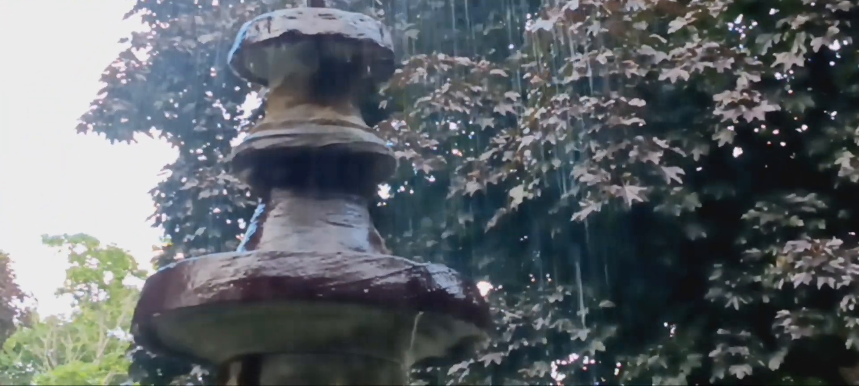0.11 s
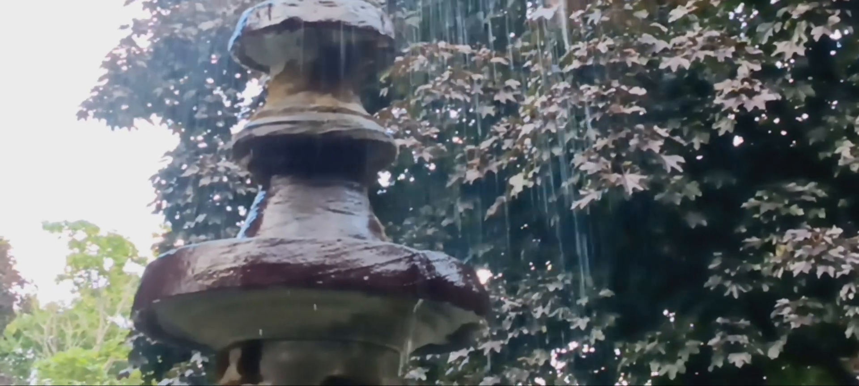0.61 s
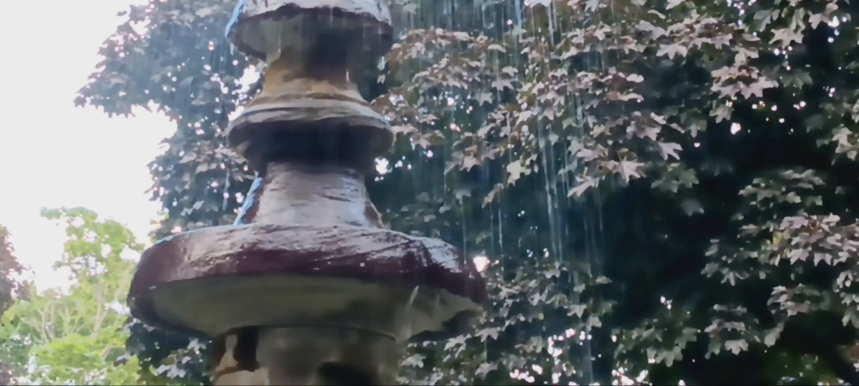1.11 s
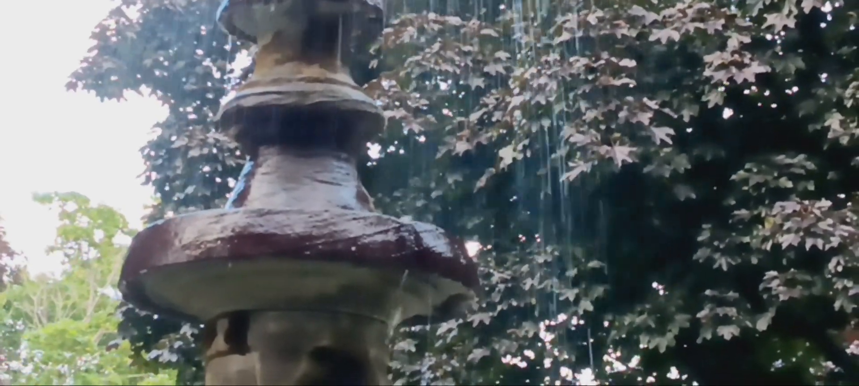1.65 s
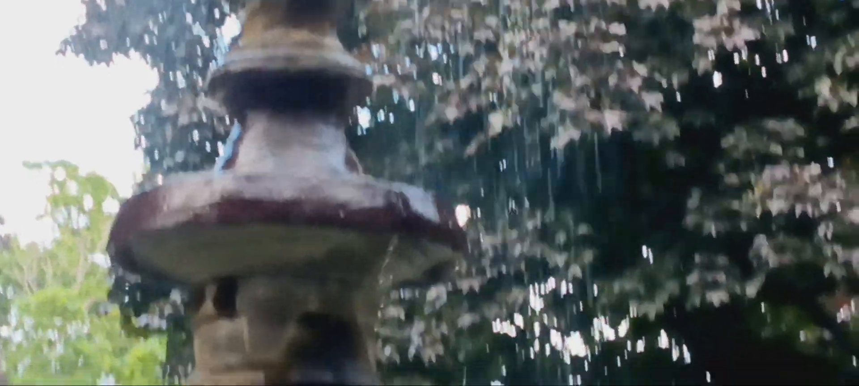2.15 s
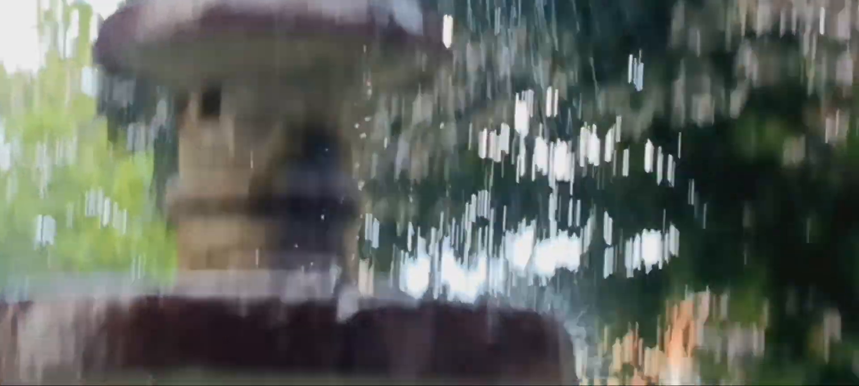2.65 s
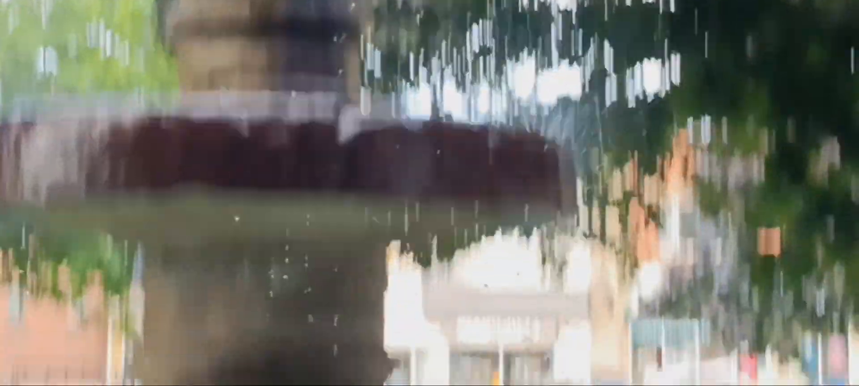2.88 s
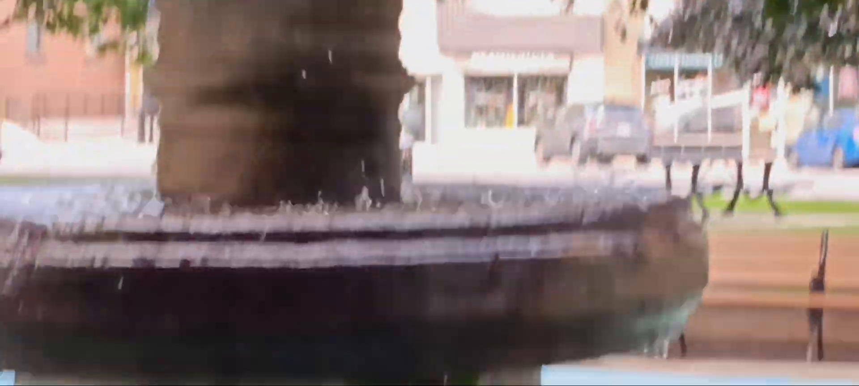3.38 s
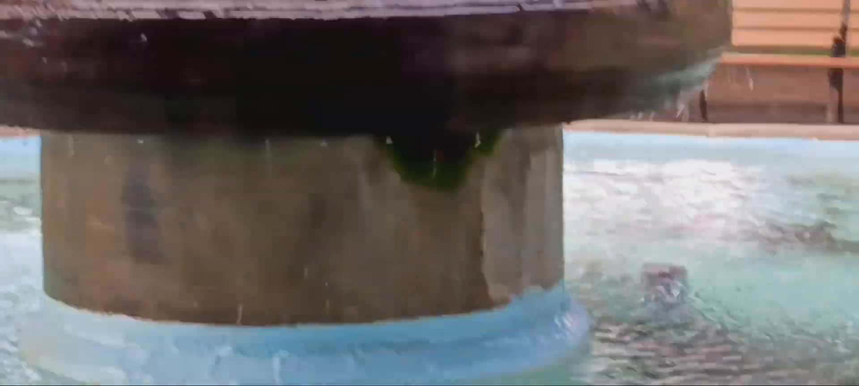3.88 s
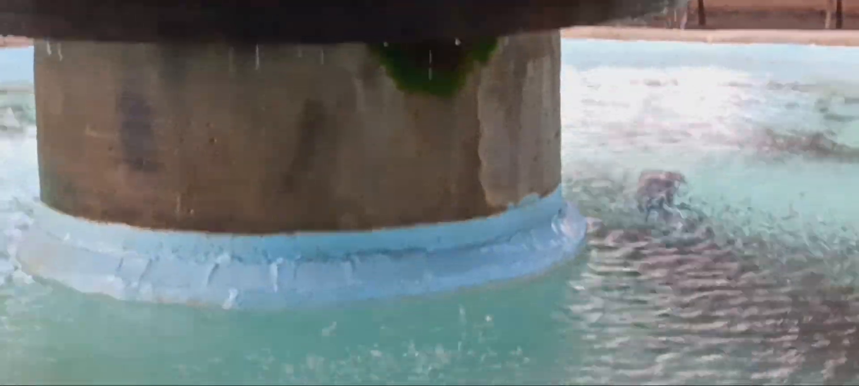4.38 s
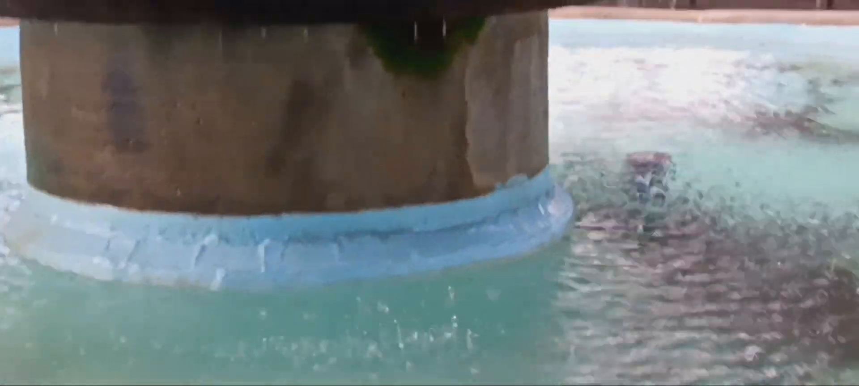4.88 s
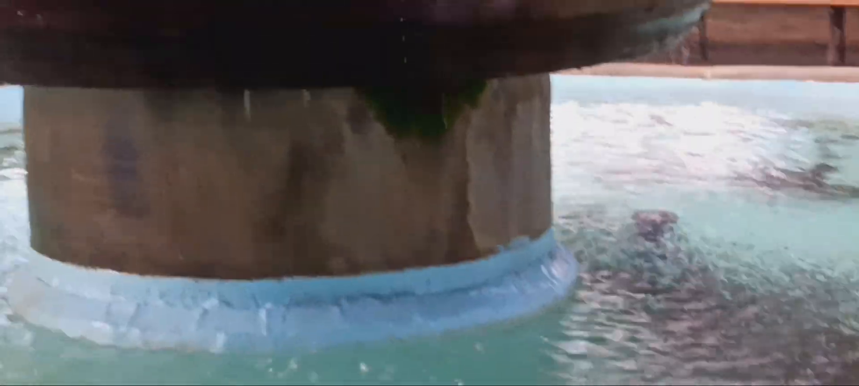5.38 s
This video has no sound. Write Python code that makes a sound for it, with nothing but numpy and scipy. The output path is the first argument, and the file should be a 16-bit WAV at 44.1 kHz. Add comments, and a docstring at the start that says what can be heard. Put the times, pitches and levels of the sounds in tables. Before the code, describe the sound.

Close, bright fountain patter: hissing spray, sharp wet splashes and quick ringing bubbles in a stone basin, with a soft distant town rumble underneath.

```python
"""A stone fountain in a town: water falls from its tiers into the basin, over low traffic rumble.
Shaped noise makes the hissing spray and the churning wash; gliding sines make the ringing bubbles
and pattering droplets; short noise bursts make the sharp splashes. Short dense tails give the stone.
It is heard through two unlike microphone ports, the left one a little late."""
import sys
import numpy as np
from scipy import signal
from scipy.fft import rfft, irfft, next_fast_len
from scipy.io import wavfile
from scipy.ndimage import uniform_filter1d

SR = 44100
rng = np.random.default_rng(int(sys.argv[2]) if len(sys.argv) > 2 else 0)


def amp(db):
    return 10 ** (np.asarray(db, float) / 20)


def write(x):
    x = np.atleast_2d(x).T
    wavfile.write(sys.argv[1], SR, np.round(np.clip(x, -1, 1) * 32767).astype(np.int16))


N = 243431  # length in samples

# How much water falls as spray. Each row: time in seconds, spray level in dB.
SPRAY_LEVEL = [(0.0, -40), (0.12, -41), (0.43, -36.5), (0.61, -39), (1.46, -40), (1.69, -40), (1.97, -38.5),
               (2.43, -39), (3.0, -37), (3.26, -38.5), (4.3, -38), (5.0, -39), (5.4, -38), (5.52, -42.5)]
# Swells of the traffic. Each row: time in seconds, deep rumble in dB, drone above 90 Hz in dB.
RUMBLE_LEVEL = [(0.0, -39, -51), (0.31, -48.5, -44), (0.4, -52, -62), (0.47, -37.5, -49.5),
                (0.72, -46.5, -47), (0.8, -55, -50.5), (1.04, -42.5, -44), (1.92, -48.5, -49),
                (2.2, -43, -50.5), (3.06, -44, -48.5), (3.18, -44.5, -49.5), (3.32, -42.5, -45.5),
                (4.3, -42, -52.5), (4.38, -43, -51.5), (4.47, -43.5, -50.5), (5.21, -44.5, -44.5),
                (5.37, -31.5, -37.5), (5.52, -65, -54.5)]
# The random crowd of gurgling bubbles. Each row: time in seconds, level in dB.
GURGLE_LEVEL = [(0.0, -59.5), (0.3, -55), (0.7, -57.5), (0.92, -55), (1.1, -61.5), (1.3, -56), (1.7, -61.5),
                (2.33, -54.5), (2.45, -65.5), (2.75, -59.5), (3.3, -58.5), (3.55, -60), (3.66, -66.5),
                (3.93, -53.5), (4.3, -69), (4.5, -58.5), (4.75, -68), (5.03, -77), (5.18, -51.5),
                (5.52, -82)]
# Churning water in the basin. Each row: time in seconds, level in dB.
CHURN_LEVEL = [(0.0, -47.5), (0.3, -48), (0.47, -44), (0.57, -47.5), (0.66, -52.5), (0.75, -48),
               (0.97, -48.5), (1.05, -54.5), (1.18, -45), (1.28, -49), (1.4, -48), (1.62, -50.5),
               (1.75, -47), (2.18, -48), (2.26, -52.5), (2.5, -48.5), (2.8, -47.5), (3.3, -47),
               (3.7, -48.5), (4.1, -47.5), (4.3, -49.5), (4.75, -46), (4.88, -48.5), (4.98, -42.5),
               (5.15, -47.5), (5.25, -43.5), (5.52, -49)]
# Big splashes. Each row: start in seconds, slap level in dB, pitch centre of the slap in Hz,
# level of the fizz above 7 kHz in dB, length in seconds.
SPLASHES = [(0.0317, -53, 6600, -22.5, 0.014), (0.0493, -48, 6240, -26.5, 0.014),
            (0.1901, -36.5, 6600, -35, 0.14), (0.2608, -29.5, 2160, -23.5, 0.013),
            (0.3207, -26.5, 6200, -28, 0.016), (0.3662, -29, 3980, -33, 0.02),
            (0.3895, -24.5, 3960, -42, 0.018), (0.6505, -30, 6860, -34, 0.021),
            (0.8681, -31.5, 3540, -24.5, 0.015), (0.8855, -32, 3950, -50, 0.022),
            (1.0853, -39, 6150, -30, 0.017), (1.1628, -31.5, 4200, -51, 0.013),
            (0.2309, -34, 5300, -41, .015), (1.2356, -30.5, 6060, -42, 0.072),
            (1.3478, -36.5, 4270, -51, 0.29), (1.4715, -32, 6000, -31.5, 0.028),
            (1.6613, -54, 6800, -28.5, 0.03), (1.7628, -31, 4000, -28, 0.014),
            (1.9728, -31, 6800, -40, 0.14), (1.9907, -27.5, 3850, -25, 0.016),
            (2.0296, -29.5, 5400, -24.5, 0.02), (2.1121, -30, 6630, -34, 0.069),
            (2.1413, -31.5, 3320, -33, 0.047), (2.5177, -25.5, 6070, -36, 0.032),
            (2.6594, -40, 6750, -20, 0.013), (2.7082, -40, 6600, -31, .012), (2.7851, -31, 3120, -45, .012),
            (2.8365, -32, 6450, -43, .015), (2.7479, -27, 3420, -52, 0.0069),
            (2.8932, -49, 7000, -26.5, .032), (2.944, -24.5, 6300, -24.5, 0.028),
            (3.0239, -29, 3200, -32, 0.032), (3.0963, -43, 7000, -26, .024),
            (3.3411, -33, 3150, -49, 0.049), (3.3594, -34, 5900, -28, 0.047),
            (3.3819, -36, 4080, -34, 0.048), (3.676, -27, 3520, -35, 0.014),
            (3.7146, -32.5, 5200, -22.5, 0.037), (3.9639, -33, 4320, -31, 0.07),
            (3.9951, -22.5, 2810, -47, 0.012), (4.0983, -26, 3250, -41, 0.0085),
            (4.139, -28, 3340, -25, 0.013), (4.3555, -32, 2840, -45, 0.017),
            (4.4313, -30.5, 3400, -40, 0.024), (3.9474, -30, 4120, -40, .012),
            (4.5191, -30.5, 6850, -24.5, 0.05), (4.5778, -28.5, 3700, -35, 0.056),
            (4.6189, -34, 7000, -27, 0.069), (4.679, -26.5, 3900, -41, 0.031),
            (4.7255, -31, 2520, -50, .015), (4.7882, -29, 3940, -50, 0.035),
            (4.9277, -28.5, 3800, -53, 0.011), (4.9523, -29.5, 3900, -49, 0.025),
            (4.9624, -29.5, 3500, -42, 0.054), (4.9998, -41, 3700, -24, .016),
            (5.0228, -29.5, 5400, -28, 0.086), (5.0593, -28.5, 2400, -42, 0.019),
            (5.1865, -27.5, 2580, -25, 0.028), (5.2173, -26, 3800, -29, 0.026),
            (5.2429, -35, 3140, -48, 0.055), (5.3873, -48, 6700, -24, .014)]
# Bubbles that stand out singly. Each row: start in seconds, rms level in dB at the top of the swell
# ahead of port colour, start pitch in Hz, pitch factor reached after one length, length in seconds.
SINGLE_BUBBLES = [(0.067, -38, 838, 1.09, 0.014), (0.17, -38.5, 815, 0.94, 0.021),
                  (0.25, -35, 893, 0.95, 0.0096), (0.269, -37.5, 840, 0.99, 0.017),
                  (0.376, -44, 777, 0.98, 0.034), (0.378, -47, 1530, 1.16, 0.006),
                  (0.407, -41.5, 993, 1.17, 0.013), (0.504, -43, 2035, 0.98, 0.015),
                  (0.51, -38, 1267, 1.07, .01), (0.531, -48, 810, 1.06, 0.018),
                  (0.595, -45, 2050, 1.06, .012), (0.742, -47, 715, 1.05, 0.0087),
                  (0.85, -49, 1600, 1.3, 0.0087), (0.495, -37, 880, 0.97, 0.01),
                  (0.559, -41.5, 613, 1.27, 0.021), (0.654, -44, 1075, 0.93, 0.025),
                  (0.748, -37, 2230, 0.99, 0.003), (0.77, -30, 704, 1, 0.018),
                  (0.801, -32.5, 1280, 0.96, 0.007), (0.751, -40, 1590, 1.08, .006),
                  (0.941, -42, 750, 1.2, 0.011), (0.821, -32.5, 810, 0.94, 0.013),
                  (0.931, -36.5, 678, 1.11, 0.023), (0.955, -34, 1980, 1, 0.0049),
                  (1.196, -39, 895, 1.16, 0.0086), (1.316, -37, 910, 1.07, 0.012),
                  (1.376, -30.5, 1500, 0.91, 0.0036), (1.383, -39, 1530, 1.0, 0.03),
                  (1.428, -39, 1525, 1.0, .04), (1.135, -41.5, 1400, 1.08, 0.028),
                  (1.277, -40.5, 1410, 0.93, 0.014), (1.369, -42.5, 706, 1.12, 0.012),
                  (1.605, -47, 1215, 1.04, 0.028), (1.645, -47.5, 675, 0.97, 0.035),
                  (1.707, -48, 694, 1.03, 0.021), (1.536, -41.5, 886, 1.11, 0.017),
                  (1.779, -28, 1330, 1.04, 0.0039), (1.783, -48, 823, 0.98, 0.033),
                  (1.84, -37, 702, 1.08, 0.012), (1.873, -41, 1670, 0.92, 0.0077),
                  (1.929, -42.5, 585, 1.06, 0.029), (2.067, -37, 783, 1.35, 0.012),
                  (2.082, -34, 2080, 1.04, 0.0068), (2.111, -41, 2110, 1.0, 0.0086),
                  (2.138, -51, 2080, 0.85, 0.0097), (2.179, -42.5, 2160, 0.96, 0.016),
                  (2.163, -38, 837, 0.98, 0.023), (2.371, -44.5, 1680, 1.0, 0.02),
                  (2.436, -48, 2200, 0.75, 0.014), (2.592, -47, 864, 0.95, 0.014),
                  (2.652, -49, 945, 1.02, 0.014), (2.7, -48, 874, 0.82, 0.021),
                  (2.736, -34, 1600, 0.88, 0.0038), (2.81, -43.5, 828, 1.1, 0.012),
                  (2.848, -45, 880, 1.0, 0.012), (2.27, -45, 690, 1.07, 0.019),
                  (2.328, -41, 642, 1.12, 0.033), (2.373, -46, 840, 0.81, 0.028),
                  (2.566, -41.5, 880, 0.93, 0.011), (2.748, -41.5, 730, 1.15, 0.01),
                  (2.948, -47, 900, 1, 0.026), (3.029, -43.5, 880, 1.01, 0.018),
                  (3.052, -54, 1630, 1.6, 0.0058), (3.118, -35.5, 2175, 1, 0.009),
                  (3.149, -40.5, 786, 0.98, 0.028), (3.201, -38.5, 867, 0.98, 0.0093),
                  (3.133, -49, 880, 1.16, 0.016), (3.217, -36, 1000, 1.8, 0.0068),
                  (3.14, -38.5, 1750, 1.06, 0.0078), (1.172, -47, 845, 0.97, 0.029),
                  (1.226, -46, 766, 1.1, 0.018), (4.366, -45.5, 1144, 0.98, 0.012),
                  (4.622, -44.5, 788, 1.06, 0.016), (4.868, -46, 1110, 1.02, 0.023),
                  (0.71, -39.5, 1485, 1.03, 0.012), (0.782, -48, 945, 1.2, 0.013),
                  (3.41, -49, 740, 1, 0.013), (3.295, -49.5, 762, 1.06, 0.043),
                  (3.343, -37, 1630, 1.07, 0.0079), (3.436, -32, 2370, 1.1, .006),
                  (3.483, -45, 820, 1.1, 0.017), (3.566, -49, 770, 1.5, 0.0092),
                  (3.69, -46, 2300, 1.1, .006), (3.779, -49, 900, 1.0, 0.011),
                  (3.809, -40, 1050, 1.15, 0.01), (3.905, -54, 855, 0.94, 0.0086),
                  (3.963, -45, 895, 1.06, 0.012), (4.087, -36, 1910, 0.93, 0.0066),
                  (4.238, -41, 1980, 1.04, 0.014), (4.303, -43, 1160, 0.91, 0.0089),
                  (4.28, -40, 1590, 1.2, 0.0056), (4.43, -41, 1980, 0.98, 0.006),
                  (4.542, -46, 768, 1.0, 0.021), (4.696, -41, 1900, 1.2, 0.0061),
                  (4.755, -38, 2250, 0.94, 0.0044), (4.917, -41, 1990, 1.1, 0.01),
                  (3.638, -31.5, 2010, 1.04, 0.0043), (3.824, -34.5, 820, 1.16, 0.018),
                  (3.928, -39, 913, 0.91, 0.01), (3.985, -26.5, 1810, 0.89, 0.0054),
                  (4.052, -26.5, 780, 1.25, 0.0095), (4.07, -46, 1050, 0.89, 0.022),
                  (4.145, -41.5, 930, 0.92, 0.013), (4.391, -47.5, 860, 1.06, 0.018),
                  (4.515, -38.5, 1074, 1.05, 0.0096), (4.628, -29, 1520, 0.9, 0.0044),
                  (4.642, -41, 1300, 0.86, 0.0087), (4.765, -48, 690, 0.98, 0.025),
                  (4.856, -39, 583, 1.07, 0.026), (4.948, -44, 2240, 1.3, 0.011),
                  (4.959, -38, 810, 1.13, 0.0063), (4.98, -43, 1620, 0.76, 0.012),
                  (5.055, -28.5, 1640, 0.94, 0.004), (5.058, -31, 2250, 1, 0.0035),
                  (5.096, -38, 1295, .92, 0.025), (5.151, -38, 775, 2.06, 0.013),
                  (5.177, -41, 764, 1.04, 0.019), (5.274, -38, 1870, 1.33, 0.0085),
                  (5.28, -47.5, 685, 0.97, 0.029), (5.346, -43.5, 732, 1.03, 0.022),
                  (5.115, -42.5, 816, 0.95, 0.034), (5.383, -43, 1203, 1.05, 0.031),
                  (5.441, -35.5, 1254, 1.2, 0.013), (5.408, -39, 770, 0.93, 0.026),
                  (5.492, -40, 587, 1.27, 0.02), (5.51, -32, 970, 1, 0.0048)]
# Colour of the two microphone ports. Each row: frequency in Hz, left gain in dB, right gain in dB.
PORT_COLOUR = [(148, -3, -3.5), (780, -3, -2), (880, 0.5, -6.5), (1153, -5, -9.5), (1690, 2, -9.5),
               (2580, 1, -3.5), (4140, 1, 1), (5400, -3.5, 7), (6600, 8, 7), (7950, 0.5, 4),
               (10320, 8.5, 15.5), (11520, 10, 7), (13400, 2.5, 0.5), (15800, -2.5, -2)]
# Relative spectrum of the traffic. Each row: frequency in Hz, density in dB per Hz.
RUMBLE_SPECTRUM = [(8.8, -41), (15, -17), (54, 1), (97, 0), (144, -3), (216, -18), (257, -25.5),
                   (409, -41.5), (480, -68), (620, -80), (1060, -120)]
# Relative spectrum of the spray ahead of port colour. Each row: frequency in Hz, density in dB per Hz.
SPRAY_SPECTRUM = [(300, -7), (500, -16), (800, -17), (1300, -16), (2200, -10), (3500, -13), (6000, -1.5),
                  (15000, 1)]
# Relative spectrum of the basin wash ahead of port colour. Each row: frequency in Hz, density in dB per Hz.
WASH_SPECTRUM = [(500, -30), (700, -21), (1100, -18), (1500, -2), (2500, 0), (4000, 2), (6000, -16)]
# How alike the two sides of a noise are. Each row: frequency in Hz, left-right likeness from 0 to 1.
LIKENESS = [(20, .72), (60, .83), (130, .88), (300, .72), (450, .45), (700, .75), (1500, .5), (3000, .55),
            (5000, .35), (9000, .15)]
# Swell of a bubble. In order: rise as a share of its length, rise shape, decay rate, decay shape.
BUBBLE_SWELL = (0.33, 1.2, 1.05, 0.5)
# The stereo balance drifts once. In order: start in seconds, end in seconds.
DRIFT_S = (2.2, 4.6)
# Left over right in dB, before and after the drift; spray() takes out each side's average.
SPRAY_PAN_DB, SPLASH_PAN_DB = (-7.5, -4.5), (-2, 0)


def evened(x):
    """Scales to rms 1."""
    return x / np.sqrt(np.mean(x ** 2) + 1e-20)


def smoothed(x, first, second, axis=-1):
    """Smooths with two running means, leaving slower random movement."""
    return uniform_filter1d(uniform_filter1d(x, size=first, axis=axis), size=second, axis=axis)


def read(points, hz, axis=1):
    """Reads a spectrum column on a log-frequency axis."""
    table = np.transpose(points)
    return np.interp(np.log(hz + 1), np.log(table[0] + 1), table[axis])


def curve(rows, axis=1):
    """Gain at every sample from rows of time and dB."""
    table = np.transpose(rows)
    return amp(np.interp(np.arange(N) / SR, table[0], table[axis]))


def drifted(before_after, s):
    """A balance that slides from its first to its second setting."""
    return np.interp(s, DRIFT_S, before_after)


def add(mix, s, sound, pan_db):
    """Places a sound in the stereo mix."""
    part = mix[:, round(s * SR):][:, :sound.shape[-1]]
    panned = sound * amp(np.array([[.5], [-.5]]) * pan_db)
    part += panned[:, :part.shape[1]]


def ports(x):
    """Each microphone port boosts and dulls its own frequencies."""
    size = next_fast_len(N)
    hz = np.fft.rfftfreq(size, 1 / SR)
    colour_db = np.array([read(PORT_COLOUR, hz, axis=1), read(PORT_COLOUR, hz, axis=2)])
    return irfft(rfft(x, size) * amp(colour_db), size)[:, :N]


def noise(spectrum, size, patchy_db, flicker_db):
    """Stereo noise of random short-time spectra with drifting patches and a broad flicker."""
    frames, hz = 2 * N // size + 3, np.fft.rfftfreq(size, 1 / SR)
    draws = rng.standard_normal((frames, len(hz), 6))
    a, b, c, d, patches, flicker = np.ascontiguousarray(draws.T)
    # patches are narrow and last; the flicker is wide and quick
    patches = evened(uniform_filter1d(uniform_filter1d(patches, size=5, axis=0), size=14, axis=1))
    flicker = evened(uniform_filter1d(uniform_filter1d(flicker, size=60, axis=0), size=3, axis=1))
    same = np.clip(read(LIKENESS, hz), 0, 1)[:, None]
    left = a + 1j * b
    right = same * left + np.sqrt(1 - same ** 2) * (c + 1j * d)
    level_db = read(spectrum, hz)[:, None] + patchy_db * patches + flicker_db * flicker
    z = np.array([left, right]) * amp(level_db)
    # half-overlapped sine windows keep the power even
    return signal.istft(z, window="cosine", nperseg=size, noverlap=size // 2)[1][:, :N]


def ring(s, db, hz, factor, length):
    """Each bubble is a sine that swells, dies away and shifts pitch as it nears the surface."""
    rise, soft, decay, shape = BUBBLE_SWELL
    samples = (2.2 * length * SR).astype(int)
    # all bubbles are strung end to end: whose sample it is, and how far into that bubble
    who = np.repeat(np.arange(len(s)), samples)
    step = np.arange(len(who)) - (np.cumsum(samples) - samples)[who]
    u = (step / (length * SR)[who]).astype(np.float32)
    gliding = np.minimum(u, 1.5)  # the glide stops after one and a half lengths
    turns = (hz * length)[who] * (u + (factor - 1)[who] * gliding * (u - gliding / 2))
    swell = np.minimum(u / rise, 1) ** soft * np.exp(-decay * np.maximum(u - rise, 0) ** shape)
    return who, step, np.sqrt(2) * amp(db)[who] * swell * np.sin(2 * np.pi * turns)


def bubble(s, db, hz, factor, length, pan_db, skew):
    """Rings a crowd of bubbles through the ports; skew is the extra path time to the left port."""
    who, step, wave = ring(s, db, hz, factor, length)
    tilt = amp(pan_db / 2)[who]
    left_start = (np.maximum(s + skew, 0) * SR).astype(int)
    right_start = (s * SR).astype(int)
    left = np.bincount(left_start[who] + step, wave * tilt, N)
    right = np.bincount(right_start[who] + step, wave / tilt, N)
    return ports(np.array([left[:N], right[:N]]))


def patter(low_hz, high_hz, cycles, glide, per_s, spread_db, scatter_s):
    """Random bubbles of many pitches, a few loud, each from its own spot."""
    gap, size, pitch, drift, life, side, spot = rng.random((20000, 7)).T
    s = np.cumsum(-np.log(1 - gap)) / per_s
    db = -spread_db * np.log(size + 0.0068)
    hz = low_hz * (high_hz / low_hz) ** pitch
    factor = 1 + glide * (2 * drift - .6)  # more rise than fall
    length = cycles / hz * (0.39 + 1.6 * life)
    crowd = np.array([s, db, hz, factor, length, 12 * (side - .5), scatter_s * (spot - .5)])
    return evened(bubble(*crowd[:, s < N / SR]))


def rumble():
    """Distant traffic, nearly alike in both ports: a deep part and a lumpy drone that swell apart."""
    both = noise(RUMBLE_SPECTRUM, size=2048, patchy_db=-0.5, flicker_db=0.65)
    both = both * amp(np.array([[.7], [-.7]]))
    deep = signal.sosfiltfilt(signal.butter(3, 90, fs=SR, output="sos"), both)
    lumps = amp(2.2 * evened(smoothed(rng.standard_normal(N), 5000, 2500)))
    drone = evened(lumps * (both - deep))
    return curve(RUMBLE_LEVEL) * evened(deep) + curve(RUMBLE_LEVEL, axis=2) * drone


def churn():
    """Overlapping higher-pitched drips ring in a patchy wash; the water comes in clumps with lulls between."""
    wash = evened(ports(noise(WASH_SPECTRUM, size=512, patchy_db=5., flicker_db=3.5)))
    drips = patter(1250, 5000, cycles=8., glide=.05, per_s=1000, spread_db=2.3, scatter_s=.0004)
    clumps = evened(smoothed(rng.standard_normal(N), 1800, 900))
    clumps = evened(amp(1.5 * clumps))
    return curve(CHURN_LEVEL) * clumps * (wash + amp(-2.0) * drips)


def gurgle():
    """Bubbles ring where the streams plunge into the basin: some stand out singly from a random crowd."""
    # the single ones lean right yet on average lie a little nearer the left port; each has its own spot
    pan_db = -1.4 + 6 * (rng.random(len(SINGLE_BUBBLES)) - .5)
    skew_s = -0.000031 + 0.00033 * (rng.random(len(SINGLE_BUBBLES)) - .5)
    single = bubble(*np.transpose(SINGLE_BUBBLES), pan_db, skew_s)
    crowd = patter(620, 1600, cycles=12., glide=.12, per_s=260, spread_db=2.2, scatter_s=.0003)
    # a quick random waver roughens every ring, not quite alike in both ports
    waver = evened(smoothed(rng.standard_normal((2, N)), 260, 130))
    waver = evened(amp(1.6 * (waver[0] + 0.9 * waver)))
    return waver * (single + curve(GURGLE_LEVEL) * crowd)


def spray():
    """Fine spray hisses as patchy noise; short ringing droplets patter and tick within it."""
    hiss = evened(ports(noise(SPRAY_SPECTRUM, size=256, patchy_db=2.0, flicker_db=1.5)))
    fine = patter(3260, 14970, cycles=6., glide=0.133, per_s=2000, spread_db=3.0, scatter_s=.0008)
    ticks = patter(2000, 7000, cycles=2.5, glide=.1, per_s=450, spread_db=2.5, scatter_s=.0006)
    lean = amp(drifted(SPRAY_PAN_DB, np.arange(N) / SR)) ** np.array([[.5], [-.5]])
    lean = lean / lean.mean(axis=1)[:, None]  # only the drift is left
    return curve(SPRAY_LEVEL) * lean * (amp(0.16) * hiss + amp(-9.0) * fine + amp(-16) * ticks)


def splashes():
    """Each slug of water hits at once and breaks up into a crackling, dying burst."""
    crackle = evened(amp(4.6 * evened(uniform_filter1d(rng.standard_normal(N + SR), size=40))))
    # each row: frequency in Hz, relative density in dB per Hz
    low_spectrum = [(1200, -100), (2000, -4), (2800, -1), (7000, -9.5), (9000, -10.0)]
    high_spectrum = [(4500, -27), (7000, -4.5), (16000, -10.5)]
    low = noise(low_spectrum, size=256, patchy_db=0.5, flicker_db=-3)
    high = noise(high_spectrum, size=256, patchy_db=0.0, flicker_db=-2.0)
    low, high = (np.pad(evened(ports(x)), ((0, 0), (0, SR))) * crackle for x in (low, high))
    # many lesser ones, drawn as range and lowest value in the columns of SPLASHES
    minor = rng.random((330, 5)) * [N / SR, 13, 4500, 12, .013] + [0, -49, 2002, -40.5, .004]
    mix = np.zeros((2, N))
    for s, slap_db, hz, fizz_db, length in [*SPLASHES, *minor]:
        pan_db = drifted(SPLASH_PAN_DB, s) + 5 * (rng.random() - .5)
        t = np.arange(round(1.6 * length * SR)) / SR
        # a fast attack, an extra tick of first contact, then the decay
        tick_db = 3.5 * np.exp(-t / 0.00099)
        burst = np.minimum(t / 0.00052, 1) * amp(-38 * t / length + tick_db)
        here = slice(round(s * SR), round(s * SR) + len(t))
        # the cavity punched in the surface colours the slap
        cavity = signal.lfilter(*signal.iirpeak(hz, 2.5, SR), low[:, here])
        slap = burst * (0.047 * low[:, here] + 1.9 * cavity)
        fizz = burst * high[:, here]
        # both are scaled to the burst before their levels are set
        slap, fizz = (x * np.linalg.norm(burst) / np.linalg.norm(x) for x in (slap, fizz))
        add(mix, s, amp(slap_db) * slap + amp(fizz_db) * fizz, pan_db)
    return mix


def basin(x, t60, db):
    """The stone bowls return short dense tails; three are blended in turn so no single tail colours the sound."""
    t = np.arange(round(.12 * SR)) / SR
    tails = rng.standard_normal((3, 2, len(t))) * amp(-60 * t / t60) * np.minimum(t / 0.0051, 1)
    turn = np.pi * 3.1 * np.arange(N) / SR
    wet = 0
    for k, tail in enumerate(tails):
        wet = wet + signal.oaconvolve(x * np.cos(turn + k * np.pi / 3), tail, axes=1)
    return x + amp(db) * wet[:, :N] / np.linalg.norm(tails[:, 0]) * np.sqrt(2)


def scene():
    """All the water and the town behind it; the spray stays free of the stone tails."""
    water = basin(churn() + gurgle() + splashes(), t60=.11, db=-12)
    return rumble() + spray() + water


def top_cut(x):
    """Nothing passes above the cut-off."""
    return signal.sosfilt(signal.butter(12, 16860, fs=SR, output="sos"), x)


def record(dry):
    """The left channel runs 43 samples late; then a steep low-pass at 15950 Hz takes off the top."""
    late = np.array([np.roll(dry[0], 43), dry[1]])
    edge = signal.firwin(511, 15950, window=("kaiser", 9), fs=SR)
    mix = signal.oaconvolve(late, edge[None], "same", axes=1)
    return top_cut(mix)


dry = scene()
out = record(dry)
write(out)
```